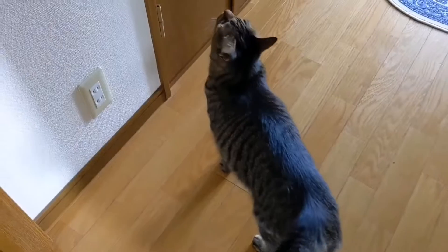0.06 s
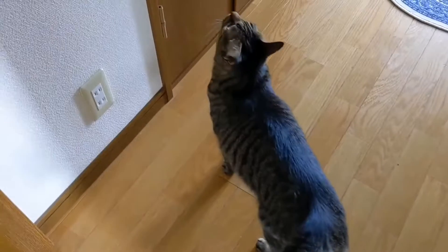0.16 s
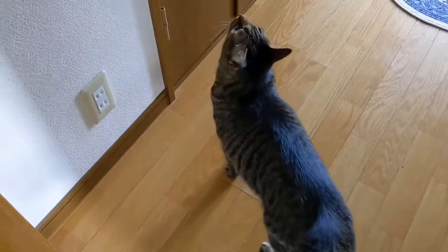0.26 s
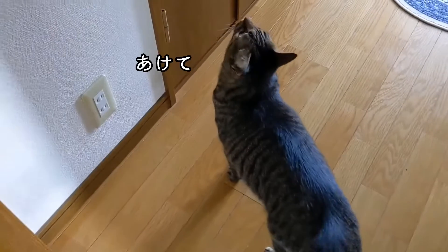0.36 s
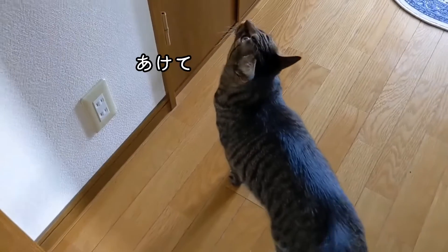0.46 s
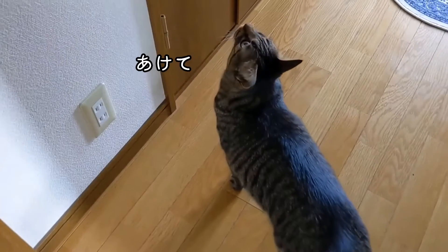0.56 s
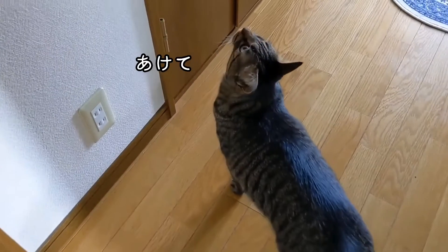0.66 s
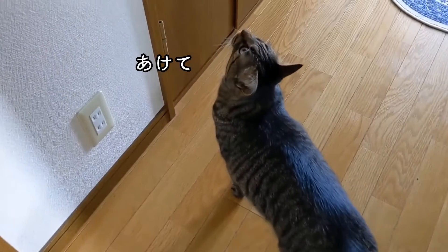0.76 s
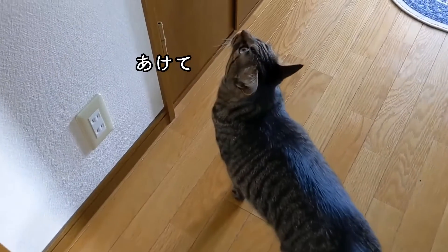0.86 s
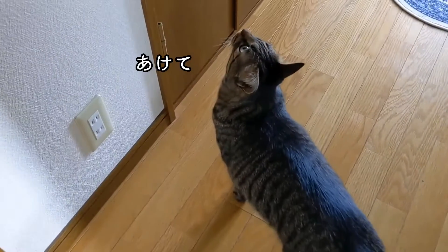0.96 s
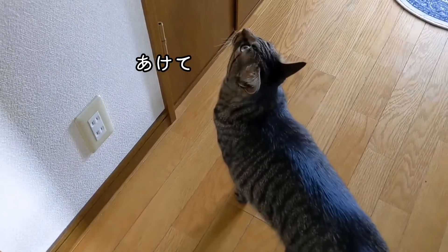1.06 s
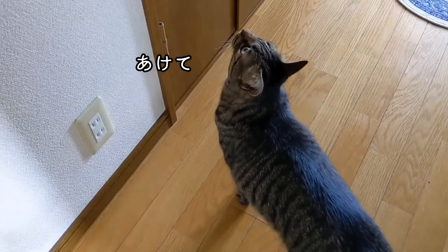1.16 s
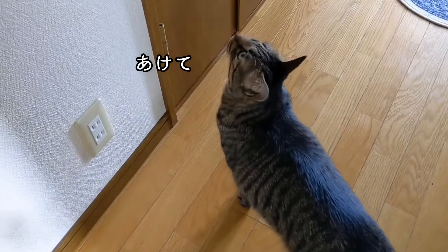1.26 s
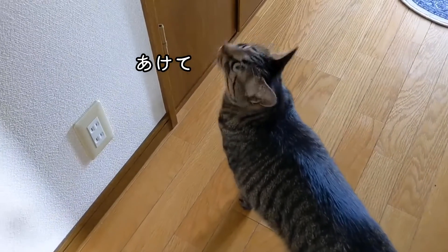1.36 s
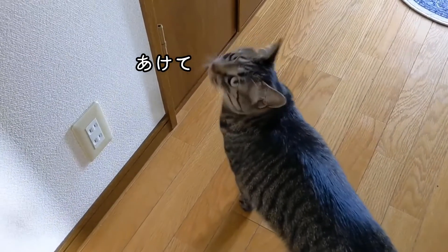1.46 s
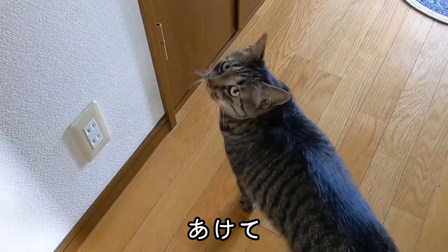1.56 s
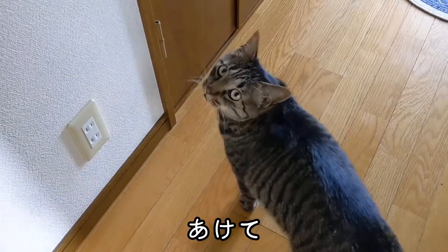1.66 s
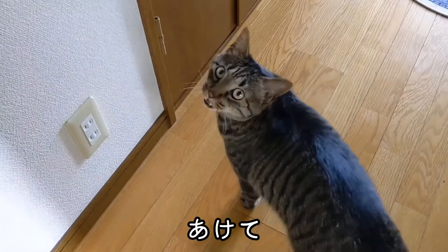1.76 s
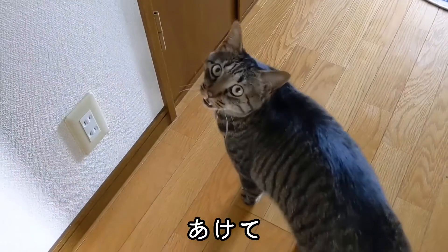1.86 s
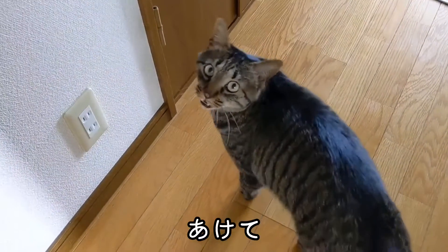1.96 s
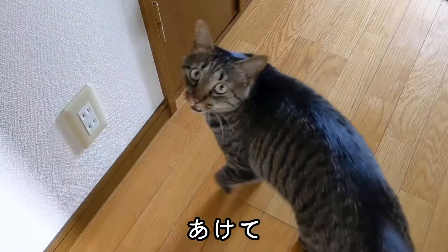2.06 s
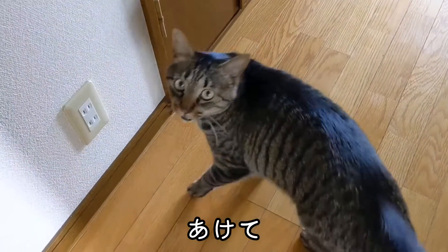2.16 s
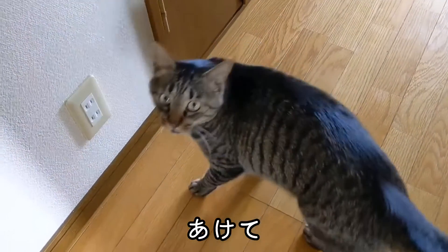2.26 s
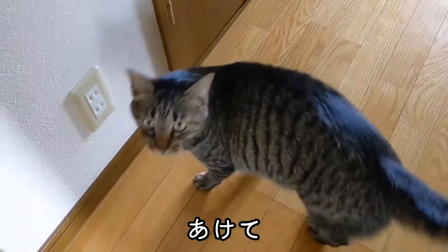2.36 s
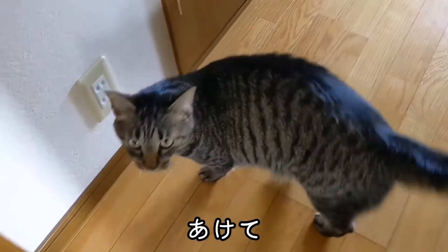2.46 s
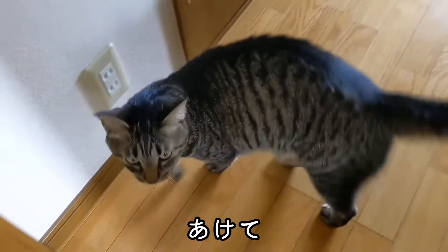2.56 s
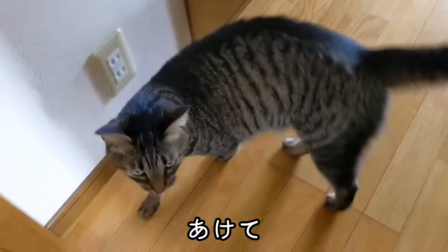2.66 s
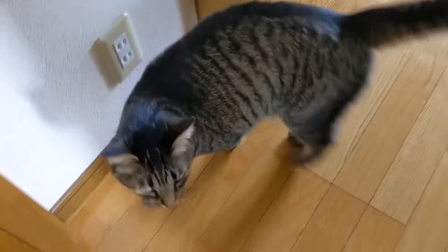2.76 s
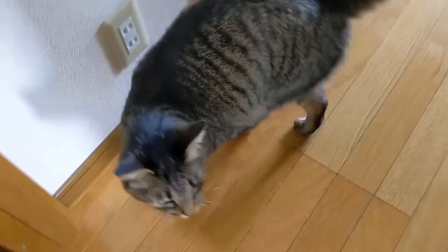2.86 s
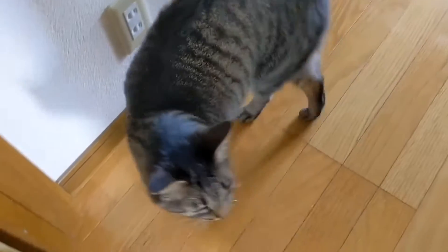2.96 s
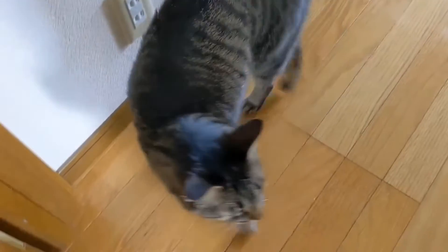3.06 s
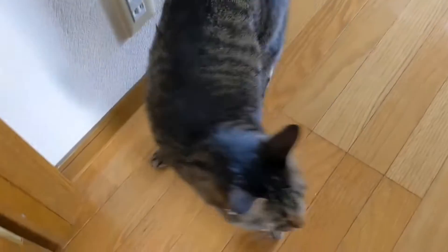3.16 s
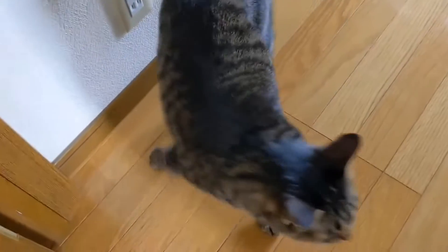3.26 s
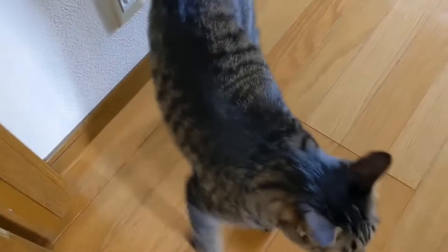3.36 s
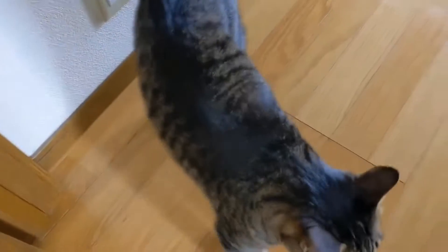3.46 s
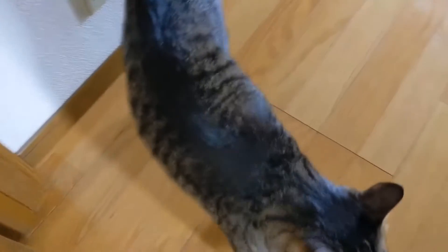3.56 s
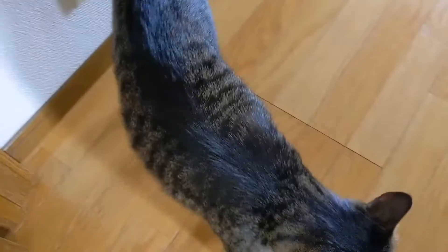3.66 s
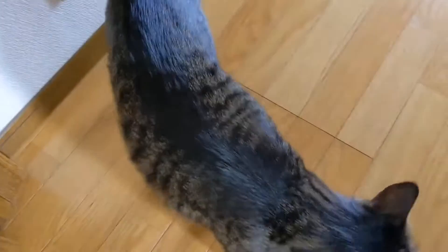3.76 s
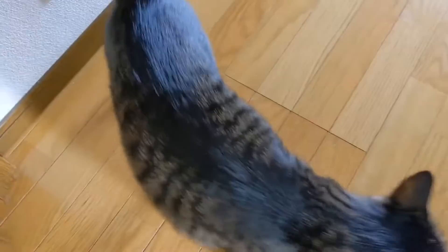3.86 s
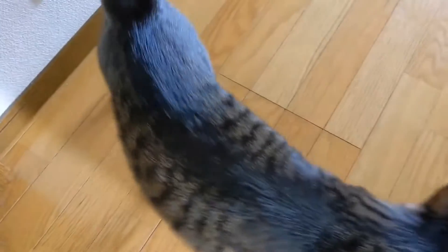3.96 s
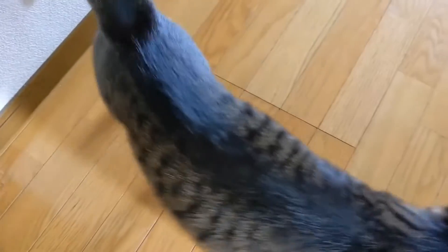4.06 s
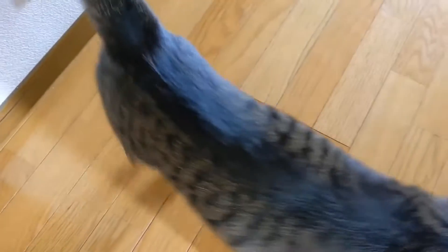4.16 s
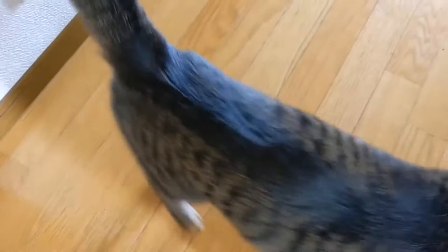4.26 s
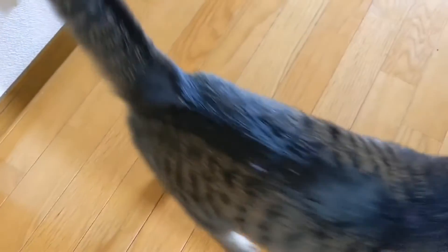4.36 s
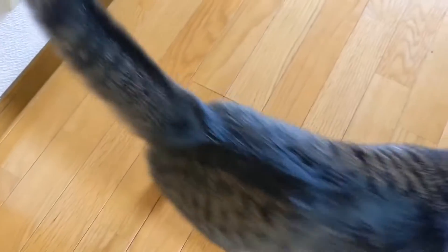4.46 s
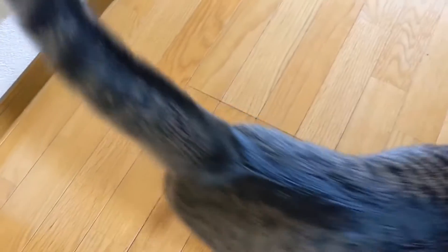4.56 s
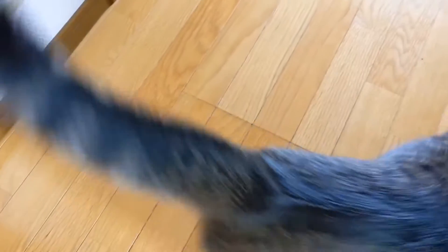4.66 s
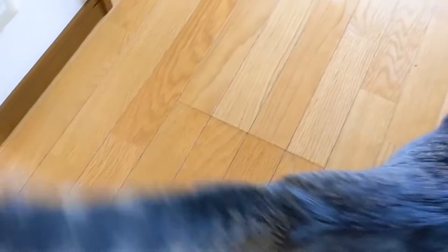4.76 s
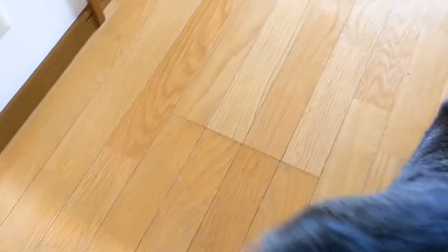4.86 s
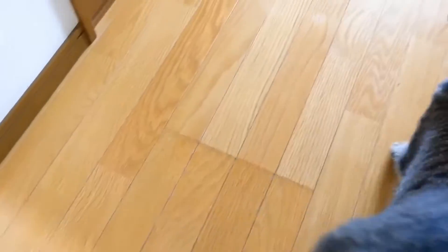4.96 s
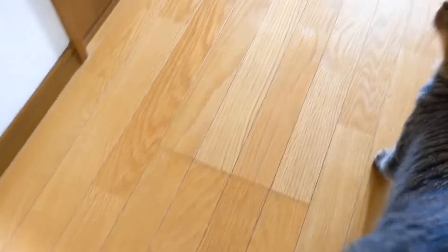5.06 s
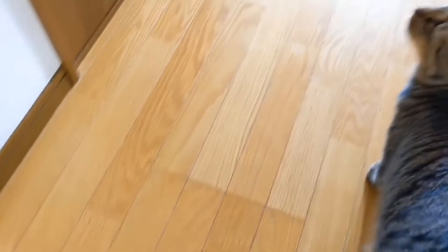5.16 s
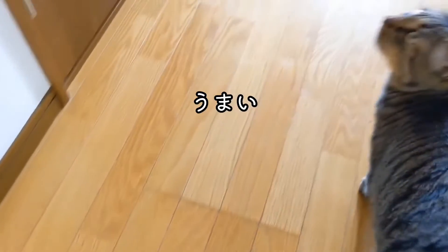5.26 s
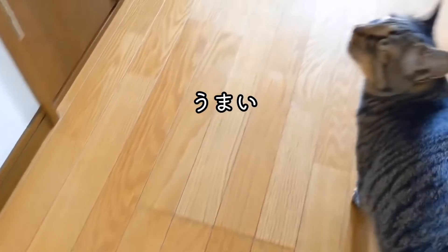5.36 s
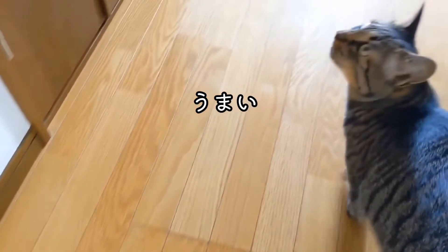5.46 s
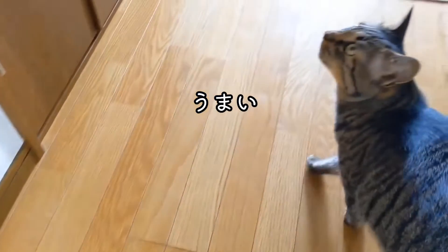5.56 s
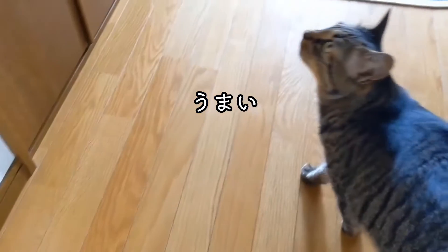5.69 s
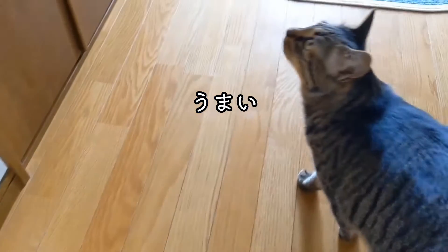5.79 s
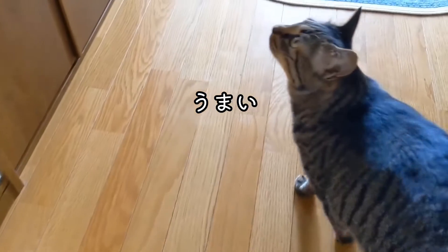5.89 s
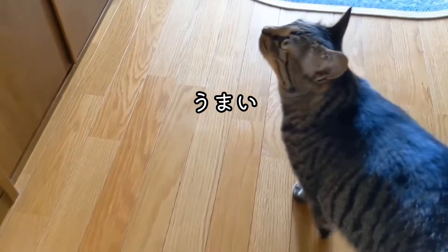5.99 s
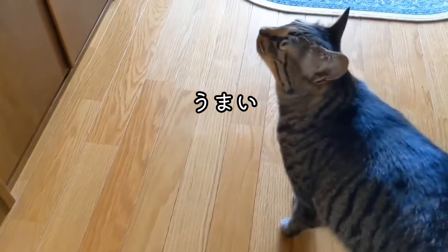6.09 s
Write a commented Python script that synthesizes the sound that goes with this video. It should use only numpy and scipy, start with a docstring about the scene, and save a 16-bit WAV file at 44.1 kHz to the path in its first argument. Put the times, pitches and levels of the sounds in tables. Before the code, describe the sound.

Soft thuds, then a pleading cat meows three times indoors, the second loudest and brightest, with small clicks and a board creak between calls.

```python
"""Soft bumps over a low rumble, then a cat begs at a door with three drawn-out meows in a small hall.
Each meow is a stack of harmonics shaped by mouth, floor and door, with hoarse noise and creaky last pulses.
Bumps are decaying low tones with dull noise, ticks are band-limited bursts, and a board creaks by slipping.
A noise echo answers for the walls; behind it lie camera rumble and rustle, room noise and a faint whine."""
import sys
import numpy as np
from scipy import signal
from scipy.fft import rfft, irfft, next_fast_len
from scipy.io import wavfile
from scipy.ndimage import uniform_filter1d, map_coordinates

SR = 44100
rng = np.random.default_rng(int(sys.argv[2]) if len(sys.argv) > 2 else 0)


def materialize(psi):
    """Save the field psi as 16-bit PCM at rate SR to the path in sys.argv[1].

    A 1-D psi becomes a single channel; in a 2-D psi each row is a channel.
    """
    bounded = np.clip(np.atleast_2d(psi).T, -1, 1)
    quanta = np.round(bounded * 32767).astype(np.int16)
    wavfile.write(sys.argv[1], SR, quanta)


N = 270200  # length in samples


def amp(db):
    """Decibels to gain."""
    return 10 ** (np.asarray(db) / 20)


def unit(x):
    """x at rms 1."""
    return x / np.sqrt(np.mean(x ** 2) + 1e-20)


def along(points, hz):
    """Read (Hz, value) points on a log frequency axis."""
    f, v = np.transpose(points)
    return np.interp(np.log(hz + 1), np.log(f + 1), v)


def curves(rows, x):
    """Read each column after the first at the places x of the first column."""
    places, *columns = np.transpose(rows)
    return [np.interp(x, places, column) for column in columns]


def wobble(rate, size):
    """A smooth random curve with rate knots a second."""
    knots = rng.standard_normal(int(size * rate / SR) + 4)
    return map_coordinates(knots, [np.arange(size) * rate / SR])


def bell(t, centre, half):
    """A smooth swell of height 1."""
    return np.exp(-((t - centre) / half) ** 2)


def plateau(t, centre, half):
    """A swell of height 1 with a flat top and steep sides."""
    return np.exp(-((t - centre) / half) ** 6)


def filtered(x, response):
    """Shape the spectrum of x by a response of frequency."""
    size = x.shape[-1]
    padded = next_fast_len(size + 8192)
    return irfft(rfft(x, padded) * response(np.fft.rfftfreq(padded, 1 / SR)), padded)[..., :size]


def spread(pair, likeness):
    """Blend two independent noises into left and right with the given correlation at each frequency."""
    def mid_side(hz):
        turn = np.arccos(np.clip(likeness(hz), -1, 1)) / 2
        return np.array([np.cos(turn), np.sin(turn)])
    mid, side = filtered(pair, mid_side)
    return np.array([mid + side, mid - side])


def add(track, s, sound):
    """Mix a sound into a stereo track at s seconds."""
    part = track[:, max(round(s * SR), 0):][:, :sound.shape[-1]]
    part += sound[..., :part.shape[1]]


# Melody up to the closing fall, one list per meow. Each row: time in seconds, pitch in Hz.
MELODIES = [
    [(.585, 662), (.62, 671.4), (.655, 667.3), (.675, 659), (.69, 672), (.73, 693.7), (.78, 720),
     (.81, 723.3), (.845, 738.4), (.91, 734.3), (.97, 743.8), (1.03, 736)],
    [(1.985, 671), (2.01, 660.5), (2.022, 670), (2.04, 702.3), (2.07, 701.6), (2.09, 720), (2.19, 777),
     (2.215, 777), (2.245, 767), (2.28, 767.6), (2.315, 799.4), (2.375, 806.7), (2.41, 764), (2.47, 779.3),
     (2.52, 780.8), (2.53, 814), (2.59, 802.3), (2.625, 782), (2.65, 720.4)],
    [(5.24, 549.4), (5.27, 512), (5.31, 548), (5.36, 605.4), (5.42, 688), (5.48, 743), (5.54, 773.6),
     (5.59, 790.3), (5.635, 768.3), (5.655, 781.8), (5.705, 787), (5.78, 778), (5.815, 760), (5.835, 744)],
]
# Loudness and colour of each meow, from mouth, push and nearby floor and door; one list per meow.
# Each row: time in seconds, relative loudness in dB, overtones over the fundamental in dB,
# resonance of the lower overtones in Hz.
VOICE_SWELLS = [
    [(.585, -40, 7, 1780), (.6, -35.5, 17.5, 1690), (.658, -33, 18, 1956), (.715, -40.5, 10, 1890),
     (.745, -44, -2.5, 1900), (.775, -38, -8, 1960), (.8, -35, 5.5, 2060), (.845, -31.5, 9, 2060),
     (.944, -39.5, 0.5, 1920), (.976, -35.5, -5, 1910), (1.079, -47.5, -12, 1830), (1.11, -47.5, -7, 1400),
     (1.15, -51.5, -4, 1179)],
    [(1.983, -35, 12, 1900), (2.011, -23.5, 20.5, 1900), (2.04, -19, 26, 2110), (2.07, -23, 23, 2100),
     (2.1, -37.5, 11, 2030), (2.135, -48, 6.5, 1890), (2.175, -47.5, 7, 1900), (2.195, -36.5, 12.5, 2000),
     (2.257, -24.5, 16.5, 2110), (2.305, -30.5, 7.5, 1910), (2.353, -38.5, 2, 2160),
     (2.44, -35.5, 13, 2130), (2.49, -34, 17, 1896), (2.52, -38, 8, 1880), (2.535, -39, -5, 1940),
     (2.58, -45, -5, 2098), (2.62, -37, -5, 2120), (2.645, -39.5, 4, 1730), (2.675, -40, 3, 1390),
     (2.715, -52.5, -5, 1150)],
    [(5.24, -38.5, -16, 1260), (5.272, -30, -8.5, 1270), (5.31, -36, -6.5, 1500), (5.35, -38.5, -7, 1570),
     (5.425, -48, 1.5, 1670), (5.465, -38, -8.5, 2230), (5.514, -40, 16, 2260), (5.6, -32.5, 11, 2070),
     (5.635, -29.5, 10.5, 2170), (5.738, -53, -1, 2350), (5.78, -40, 5, 2790), (5.86, -42, -2, 2670),
     (5.89, -50.5, 5, 2230), (5.925, -45.5, -16, 1428)],
]
# Treble of the voice, one list per meow. Each row: time in seconds, relative level in dB,
# upper mouth resonance in Hz.
TREBLES = [
    [(.585, -58, 4650), (.61, -53, 4680), (.67, -55, 4650), (.73, -63, 4850), (.77, -62, 5000),
     (.8, -58, 5050), (.87, -56, 5130), (.94, -61, 4650), (1.0, -65, 3850), (1.05, -69, 3650),
     (1.09, -65, 3450), (1.15, -76, 3300)],
    [(1.983, -58, 4500), (2.055, -46, 4850), (2.11, -60, 4700), (2.17, -64, 4600), (2.26, -50, 4500),
     (2.33, -57, 4800), (2.385, -58, 4900), (2.41, -49, 5370), (2.52, -47, 5470), (2.53, -64, 4900),
     (2.61, -78, 4700), (2.645, -61, 3750), (2.715, -78, 3300)],
    [(5.24, -88, 4400), (5.38, -77, 4600), (5.43, -62, 4600), (5.49, -62, 4850), (5.52, -65, 5150),
     (5.58, -58, 5350), (5.66, -58, 5300), (5.74, -60, 5400), (5.8, -75, 5200), (5.85, -74, 3600),
     (5.88, -64, 3400), (5.925, -74, 3200)],
]
# Shape of each meow. Each row: closing fall in octaves, hoarseness of the onset (0-1),
# moment of strain in seconds, hoarseness of the strain (0-1).
SHAPES = [(0.401, 0.6, .83, 0.04), (.55, 0.53, 2.47, 0.06), (0.68, 0.17, 5.43, 0.03)]
# The floor's reflection at the two microphones, one list per meow.
# Each row: frequency in Hz, left over right in dB, left lead in radians.
REFLECTIONS = [
    [(740, 0, 0.27), (1465, 4, 2), (2020, -7.5, 0), (2870, -3.5, -3), (5540, -10, 5)],
    [(890, -0.5, 1.16), (1530, 2.5, 2.5), (2260, -7, 1), (2880, 6, 1.5), (5400, -3.5, -1.9)],
    [(560, 0.5, 0.46), (1540, -3, 2.25), (2260, -6, 0.99), (3000, 2, 1.45), (5380.0, -3, 1.2)],
]
# The cat's stance in each meow. Each row: treble tilt in dB per octave,
# fourth harmonic over the treble in dB, room echo in dB.
STANCES = [(7, 7.5, -8.5), (5, 1, -8.5), (-12, -10, -6.5)]
# Creaky pulses as the voice gives out. Each row: start in seconds, relative level in dB,
# throat resonance in Hz.
LAST_PULSES = [(1.108, -57, 635), (2.7, -41.5, 555), (5.899, -26.5, 623)]
SWAY_RATE = 22  # changes of the echo paths a second


def cat(direct_db=0.36, sway_radians=1.105):
    """Three meows; cat and camera move, so the hall's answer sways between two sets of paths."""
    out = np.zeros((2, N))
    for melody, swells, treble, shape, reflection, stance, pulses in zip(
            MELODIES, VOICE_SWELLS, TREBLES, SHAPES, REFLECTIONS, STANCES, LAST_PULSES):
        tilt_db, fourth_db, room_db = stance
        voice = meow(melody, swells, treble, shape, reflection, tilt_db, fourth_db) + fry(*pulses)
        turn = sway_radians * wobble(SWAY_RATE, N)
        echo = np.cos(turn) * hall(voice) + np.sin(turn) * hall(voice)
        out += amp(direct_db) * voice + amp(room_db) * echo
    return out


# Colour of the leaking breath. Each row: frequency in Hz, relative level in dB per Hz.
THROAT_COLOUR = [(250, -19.5), (600, -4), (1000, -3.5), (1500, 1.5), (2200, 8), (2800, -1), (3600, -16.5),
                 (5200, -3.5), (8000, -21), (12000, -44)]
FALL_POWER = 2.1  # the closing fall gathers speed
SLACK = 2  # how fast the high harmonics break up, per octave of the closing fall


def meow(melody, swells, treble, shape, reflection, tilt_db, fourth_db,
         breathy=0.16, hiss=0.74, droop=18, attack=.012, release=.013):
    """Vocal folds give harmonics, resonances weigh them, and hoarseness makes the cycles uneven and noisy."""
    fall, onset_hoarse, strain_at, strain_hoarse = shape
    start, fall_start, end = melody[0][0], melody[-1][0], swells[-1][0]
    t = np.arange(start - attack / 2, end + release, 1 / SR)
    loudness_db, overtones_db, resonance_hz = curves(swells, t)
    treble_db, formant_hz = curves(treble, t)

    strain = strained(t, strain_at, strain_hoarse)
    hoarse = hoarseness(t, start, end, loudness_db, onset_hoarse, strain)
    fall_progress = np.clip((t - fall_start) / (end - fall_start), 0, 1)
    # past the end the pitch droops on, in octaves a second
    sunk = fall * fall_progress ** FALL_POWER + droop * np.maximum(t - end, 0)
    tune_hz = uniform_filter1d(curves(melody, t)[0], size=600) * 2 ** -sunk
    f0 = fold_pitch(t, start, tune_hz, onset_hoarse, hoarse - strain)
    phase = 2 * np.pi * np.cumsum(f0) / SR
    gains = harmonic_gains(f0, loudness_db, overtones_db, resonance_hz,
                           treble_db, formant_hz, tilt_db, fourth_db)

    sides = np.array([[.5], [-.5]])  # left, right
    voice = np.zeros((2, len(t)))
    for k, gain in enumerate(gains, 1):
        pan_db, lead = curves(reflection, k * f0)
        pan = amp(sides * pan_db)
        pan = pan / np.linalg.norm(pan, axis=0)
        # turbulence at the folds spreads a skirt of noise round each harmonic, most round the high ones
        breakup = hoarse + SLACK * np.minimum(sunk, fall) * (k > 3)
        flutter = wobble(700, len(t)) + 1j * wobble(700, len(t))
        skirt = breathy * breakup * k / 3 * flutter
        uneven = (1 + skirt) / np.hypot(1, np.abs(skirt) / 2)
        voice += 2 * gain * pan * np.real(uneven * np.exp(1j * (k * phase + sides * lead)))

    # air leaks through the folds once a cycle and rings in the throat; weak overtones muffle it
    puffs = rng.standard_normal((2, len(t))) * (1 + np.cos(phase))
    leak = unit(filtered(puffs, lambda hz: amp(along(THROAT_COLOUR, hz))))
    muffle = np.hypot(1, amp(-overtones_db))
    voice += hiss * hoarse / muffle * np.linalg.norm(gains, axis=0) * leak

    fade = np.clip((t - t[0]) / attack, 0, 1) ** 2 * np.clip((t[-1] - t) / release, 0, 1)
    track = np.zeros((2, N))
    add(track, t[0], voice * fade)
    return track


# The voice cracks for an instant as it changes register. Each row: time in seconds, hoarseness (0-1).
REGISTER_CRACKS = [(2.305, 0.06), (2.526, 0.2), (2.645, 0.2)]
STRAIN_S, CRACK_S = .066, 0.0041  # half lengths of a strain and of a crack


def strained(t, strain_at, strain_hoarse):
    """Hoarseness from one spell of strain and from sudden cracks between registers."""
    cracks = sum(rough * bell(t, s, CRACK_S) for s, rough in REGISTER_CRACKS)
    return strain_hoarse * plateau(t, strain_at, STRAIN_S) + cracks


MIDDLE_DB = -34.5  # a middling loudness
HOARSE_MIDDLE, CLEARS_DB = 0.074, 10.5  # hoarseness at that loudness; so many dB more cut it to 1/e
ONSET_S, FRAY_S = 0.014, .032  # how long the rough onset and the frayed end last
FRAY = .16  # hoarseness of the end


def hoarseness(t, start, end, loudness_db, onset_hoarse, strain):
    """The voice is clearest when loud, and rough at the onset, under strain and as it gives out."""
    weak = HOARSE_MIDDLE * np.exp(-(loudness_db - MIDDLE_DB) / CLEARS_DB)
    onset = onset_hoarse * bell(t, start, ONSET_S)
    frayed = FRAY * bell(np.minimum(t, end), end, FRAY_S)
    return np.clip(weak + onset + strain + frayed, 0, 1)


OVERSHOOT, SETTLE_S = .33, 0.0064  # the folds start up to this share too high in a hard onset, and settle


def fold_pitch(t, start, tune_hz, onset_hoarse, roughness, jitter=0.0039, rasp=0.039):
    """The folds overshoot a hard onset, jitter slowly, and rattle quickly where they are rough."""
    hardness = np.clip(2 * onset_hoarse - .5, 0, 1)
    overshoot = OVERSHOOT * hardness * np.exp(-np.maximum(t - start, 0) / SETTLE_S)
    jitters = jitter * wobble(70.64, len(t))
    return tune_hz * (1 + overshoot + jitters + rasp * roughness * wobble(600, len(t)))


# Colour of harmonics 2 to 4. Each row: frequency in Hz, relative level in dB.
LOW_COLOUR = [(1000, 24.5), (1500, -7), (2200, -11), (2700, -8), (3100, -22.5)]
# Colour of the harmonics from the fifth up. Each row: frequency in Hz, relative level in dB.
HIGH_COLOUR = [(2700, -1.5), (3350, -6), (3700, 2), (4200, -0.5), (4700, -2.5), (5300, -4), (6200, -1),
               (7200, 3.5), (8200, -22.5)]
RICH_DB = 10.5  # overtones far above the fundamental
UPPER_WIDTH_HZ = 170  # the upper resonance is narrow


def harmonic_gains(f0, loudness_db, overtones_db, resonance_hz, treble_db, formant_hz, tilt_db, fourth_db,
                   resonance_width_hz=60, flutter_db=5.5, waver_db=2.0, bead_db=2.5, count=11):
    """Power moves between the fundamental and the overtones, most to those nearest the resonances."""
    size = len(f0)
    fundamental = amp(loudness_db) / np.hypot(1, amp(overtones_db))
    lower = []
    for k in range(2, 5):
        colour = amp(along(LOW_COLOUR, k * f0) + waver_db * wobble(25.86, size))
        lower.append(colour / np.hypot(1, (k * f0 - resonance_hz) / resonance_width_hz))
    # the upper resonance moves with the jaw and picks out the nearest high harmonics, which flicker
    upper = []
    for k in range(5, count + 1):
        colour_db = along(HIGH_COLOUR, k * f0) + tilt_db * np.log2(k)
        colour = amp(colour_db + flutter_db * wobble(35.4, size))
        upper.append(colour / np.hypot(1, (k * f0 - formant_hz) / UPPER_WIDTH_HZ))
    lower = np.array(lower) / np.linalg.norm(lower, axis=0) * fundamental * amp(overtones_db)
    upper = np.array(upper) / np.linalg.norm(upper, axis=0) * amp(treble_db + waver_db * wobble(24.7, size))
    # the fourth harmonic lies between the two resonances and swells with the treble too
    lower[-1] = np.hypot(lower[-1], amp(treble_db + fourth_db))
    # a thin fundamental beats more deeply
    beads_db = waver_db + bead_db * np.clip(overtones_db / RICH_DB, 0, 1)
    return [fundamental * amp(beads_db * wobble(29.95, size)), *lower, *upper]


def fry(s, db, hz, gap_s=.009, uneven=0.12, loss_db=3.5, sink_octaves=0.16, t60=0.026, rise=0.00068, count=5):
    """Slack folds snap shut a few more times, unevenly, ever weaker and lower; each snap rings the throat."""
    track, t = np.zeros((2, N)), np.arange(SR // 20) / SR
    chance = rng.standard_normal((count, 2))
    gaps = gap_s * np.exp(uneven * chance[1:, 0])
    times = s + np.cumsum(np.r_[0, gaps])
    for k, (at, stray) in enumerate(zip(times, chance[:, 1])):
        ring_hz = hz * 2 ** (uneven * stray / 2 - sink_octaves * k)
        envelope = amp(db - loss_db * k - 60 * t / t60) * (1 - np.exp(-t / rise))
        add(track, at, envelope * np.sin(2 * np.pi * ring_hz * t))
    return track


# Echo time of the hall. Each row: frequency in Hz, 60 dB decay time in seconds.
HALL_T60 = [(200, 0.077), (700, 0.49), (2200, 0.31), (5000, 0.36), (12000, 0.018)]
# Weak, slow echo from the rooms beyond. Each row: frequency in Hz, level against the hall's start in dB.
ROOMS_BEYOND = [(200, -31), (700, -16.5), (1400, -14), (2400, -10), (5000, -14.5), (10000, -45)]
WASH_T60_S = 0.83


def hall(x, gap_s=.005):
    """Bare walls answer after a short gap; each frequency dies at its own speed, over a slower wash."""
    hz, t, z = signal.stft(rng.standard_normal((2, SR * 2 // 3)), SR, nperseg=256)
    walls = amp(-60 * t / along(HALL_T60, hz)[:, None])
    wash = amp(along(ROOMS_BEYOND, hz)[:, None] - 60 * t / WASH_T60_S)
    tail = signal.istft(z * np.hypot(walls, wash), SR, nperseg=256)[1]
    tail = np.pad(tail, ((0, 0), (int(gap_s * SR), 0)))
    # long waves reach both microphones alike: (Hz, correlation)
    likeness = [(500, 1.0), (800, 0.99), (1400, 0.018)]
    answer = spread(tail / np.linalg.norm(tail[0]), lambda f: along(likeness, f))
    return signal.fftconvolve(x, answer, axes=1)[:, :N]


# Feet on the boards and the hand on the camera. Each row: start in seconds, relative level in dB, pitch in Hz.
BUMPS = [(0.009, -43, 141), (0.076, -37, 81), (0.123, -38, 69.4), (0.157, -39.5, 63), (0.264, -46.5, 182),
         (2.819, -43, 130), (3.194, -41, 92.5), (3.36, -46, 224), (3.419, -39.5, 81), (3.494, -39.5, 210),
         (3.794, -45, 94), (4.076, -46.5, 86), (4.673, -45, 73), (4.834, -42.5, 83)]
# Deep bumps reach the microphones out of step. Each row: pitch in Hz, phase lead of the right in radians.
BUMP_LEAD = [(65, 1.56), (95, 1.2), (140, 1.7), (220, .4)]
STEP_T60_S = 0.15


def steps(level_db=1, rise=0.0038, scuff=0.56):
    """Each bump is a short, dull push: a decaying low tone with some soft noise."""
    track, t = np.zeros((2, N)), np.arange(SR // 4) / SR
    for s, db, hz in BUMPS:
        noise = rng.standard_normal((2, len(t)))
        pad = unit(filtered(noise, lambda f: 1 / (1 + (f / (2 * hz)) ** 3)))
        thud = np.sin(2 * np.pi * hz * t + [[0], [along(BUMP_LEAD, hz)]]) + scuff * pad
        envelope = amp(db + level_db - 60 * t / STEP_T60_S) * (1 - np.exp(-t / rise))
        add(track, s, envelope * thud)
    return track


# Small ticks of claws and boards, and last a puff as the mouth closes.
# Each row: start in seconds, relative level in dB, pitch in Hz,
# bandwidth in octaves, 60 dB decay time in seconds.
SMALL_BURSTS = [(2.789, -46.5, 4940, 2.6, 0.026), (3.056, -38.5, 1412, 1, 0.029),
                (3.077, -28, 13900, 0.17, 0.03), (3.172, -47.5, 1480, 1.2, 0.12),
                (3.489, -43, 474, 1.1, 0.11), (4.063, -42.5, 2840, 0.7, 0.026),
                (4.537, -34, 2050, 0.58, 0.024), (5.957, -44.5, 3100, 0.57, .1)]


def small_bursts(level_db=-6, rise=0.00015):
    """Ticks and a closing puff: short decaying bursts of noise, each in its own band."""
    track, t = np.zeros((2, N)), np.arange(SR // 8) / SR
    for s, db, hz, octaves, t60 in SMALL_BURSTS:
        noise = rng.standard_normal((2, len(t)))
        burst = unit(filtered(noise, lambda f: 1 / (1 + (np.log2((f + 1) / hz) / octaves) ** 2)))
        add(track, s, amp(db + level_db - 60 * t / t60) * (1 - np.exp(-t / rise)) * burst)
    return track


CATCH_S, RELEASE_S = 4.278, 4.345  # a board creaks under a paw between these two snaps


def creak(level_db=-59.0, ring_hz=1900, width_hz=420, body_db=-2, body_hz=620,
          rate=260, uneven=0.4, snap=2.3, pause=0.0086):
    """A board catches with a snap, slips at an uneven rate and snaps free; each slip rings its resonances."""
    t = np.arange(SR // 8) / SR
    length = RELEASE_S - CATCH_S
    turns = np.cumsum(rate * (1 + uneven * wobble(91, len(t)))) / SR
    # one slip a turn, with a pause after the catch and before the release
    slips = np.diff(np.floor(turns), prepend=0) * (t > pause) * (t < length - pause)
    slips[[0, round(length * SR)]] = snap

    def mode(f, centre):
        """One resonance of the board."""
        return 1j * f * width_hz / (centre ** 2 - f ** 2 + 1j * f * width_hz)

    knocks = slips * rng.normal(1, uneven / 2, (2, len(t)))
    ring = filtered(knocks, lambda f: mode(f, ring_hz) ** 2 + amp(body_db) * mode(f, body_hz) ** 2)
    track = np.zeros((2, N))
    add(track, CATCH_S, amp(level_db) * unit(ring))
    return track


# Shifts of the hand on the camera. Each row: time in seconds, half length in seconds,
# relative level of the rustle in dB, swell of the rumble in dB.
HAND_SHIFTS = [(0.032, 0.073, -104, 8), (0.493, 0.04, -66, -3.5), (0.577, 0.038, -55.5, 6),
               (0.744, 0.19, -70.5, 3), (3.087, 0.028, -61, 11), (3.395, 0.019, -63, 5),
               (3.496, 0.082, -79, 5), (4.92, 0.026, -67.5, 3), (5.41, 0.038, -64, 3),
               (6.074, 0.43, -59.5, 2.5)]
# Colours of the rumble, of the rustle, and of the steady room noise and hiss.
# Each row: frequency in Hz, relative level in dB per Hz.
RUMBLE_COLOUR = [(15, -53), (25, -18.5), (56, -1.5), (80, 0), (172, -2.5), (216, -4), (370, -19.5),
                 (425, -12.5), (500, -30.5), (650, -55), (1100, -120)]
RUSTLE_COLOUR = [(2000, -3.5), (5000, -11.5), (8000, -10.5), (12000, -1.5), (15000, -2.5), (16000, -22.5)]
AIR_COLOUR = [(150, -47.5), (250, -7.5), (287, -10.5), (348, -9.5), (475, -10), (772, -10), (1020, -16.5),
              (1370, -11), (1490, -12.5), (1780, -11.5), (2380, -14.5), (4380, -17), (7490, -25),
              (14200, -23), (15800, -22)]
RUMBLE_DB, RUSTLE_DB, AIR_DB = -60, -71, -61  # rumble and rustle with the hand at rest; room noise


def background(lumps_db=2.0, flicker_db=2.5):
    """Steady room noise; the camera rumbles and rustles thinly, changing at each shift of the hand."""
    t = np.arange(N) / SR
    swell_db = sum(db * bell(t, s, half) for s, half, _, db in HAND_SHIFTS)
    rumble = amp(RUMBLE_DB + swell_db + lumps_db * wobble(11, N)) * rush(RUMBLE_COLOUR)
    rubbing = amp(RUSTLE_DB) + sum(amp(db) * bell(t, s, half) for s, half, db, _ in HAND_SHIFTS)
    rustle = rubbing * amp(flicker_db * wobble(16, N)) * rush(RUSTLE_COLOUR)
    air = amp(AIR_DB) * rush(AIR_COLOUR)
    return rumble * amp([[-1.5], [1.5]]) + rustle * amp([[3], [-2]]) + air


# Likeness of the two channels of noise. Each row: frequency in Hz, left-right correlation.
NOISE_LIKENESS = [(40, 0.6), (90, 0.43), (150, 0.69), (260, 0.36), (600, 0.76), (1500, -0.1),
                  (8000, -0.029)]


def rush(colour):
    """Coloured stereo noise of rms 1, the two sides more or less alike at each frequency."""
    coloured = filtered(rng.standard_normal((2, N)), lambda hz: amp(along(colour, hz)))
    return unit(spread(coloured, lambda hz: along(NOISE_LIKENESS, hz)))


# Faint steady whine of the camera. Each row: frequency in Hz, level in dB.
CAMERA_WHINE = [(13780, -84.5), (14640, -84)]


def whine(width_hz=110):
    """Thin, steady bands of hiss, the same on both sides."""
    bands = [amp(db) * unit(filtered(rng.standard_normal(N), lambda f: bell(f, hz, width_hz)))
             for hz, db in CAMERA_WHINE]
    return sum(bands)


def scene(burst_room_db=-6, creak_room_db=-9):
    """Cat and floor sounds, the hall's echo of voice, small bursts and creak, and the background."""
    bursts, board = small_bursts() * amp([[1.5], [-1.5]]), creak()
    echo = hall(amp(burst_room_db) * bursts + amp(creak_room_db) * board)
    bumps = steps() * amp([[-1.5], [1.5]])
    return cat() + bursts + board + echo + bumps + background() + whine()


TOP_HZ = 15830  # upper band limit


def record(dry, low_cut_hz=42):
    """The camera thins the deepest bass and keeps nothing above its band limit."""
    return filtered(dry, lambda hz: (hz < TOP_HZ) * hz ** 2 / np.hypot(hz ** 2, low_cut_hz ** 2))


dry = scene()
out = record(dry)
materialize(out)
```